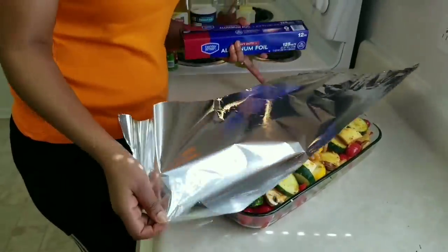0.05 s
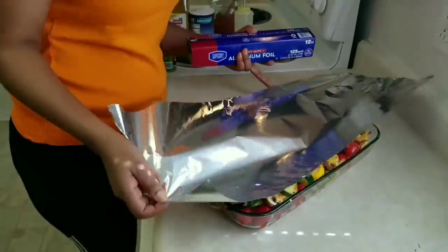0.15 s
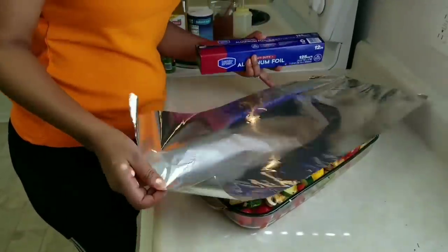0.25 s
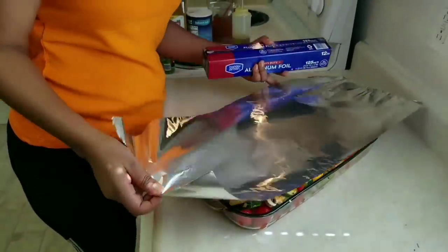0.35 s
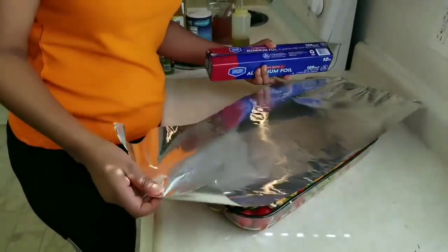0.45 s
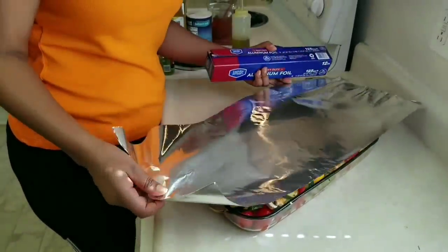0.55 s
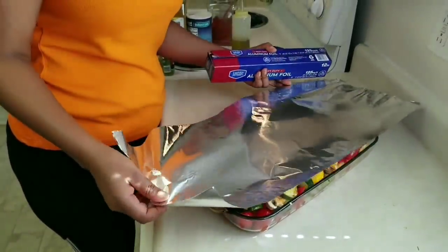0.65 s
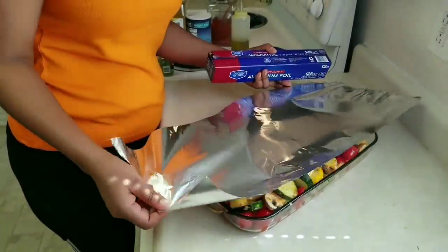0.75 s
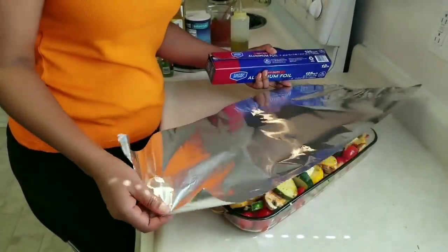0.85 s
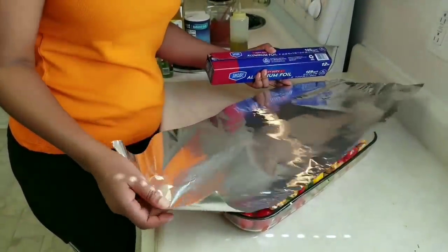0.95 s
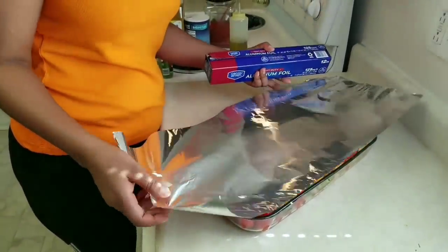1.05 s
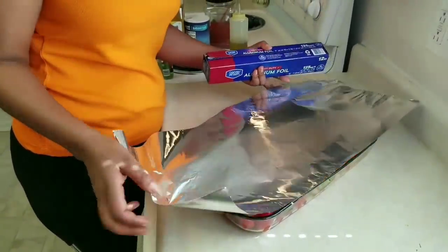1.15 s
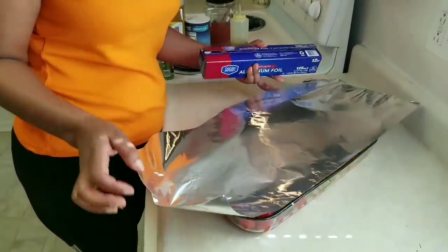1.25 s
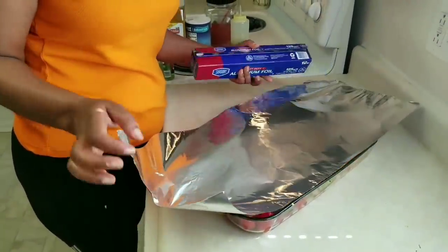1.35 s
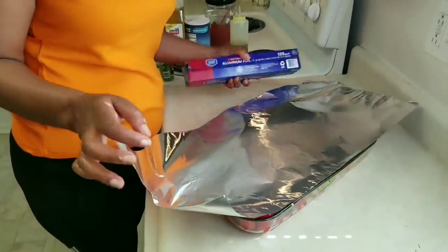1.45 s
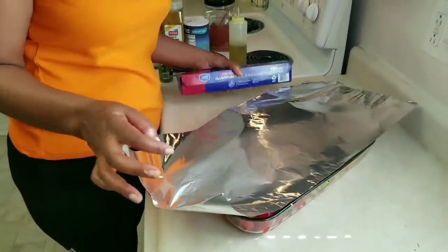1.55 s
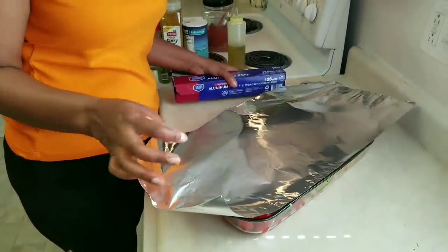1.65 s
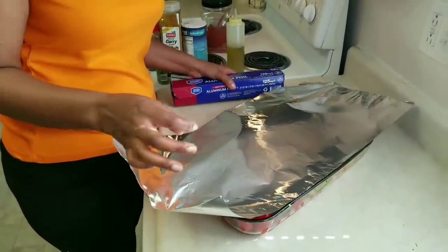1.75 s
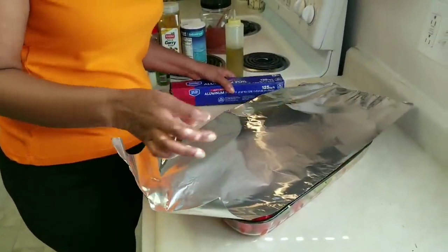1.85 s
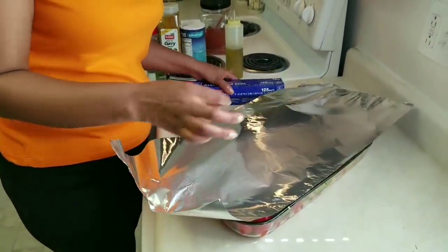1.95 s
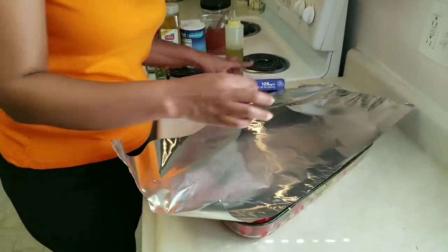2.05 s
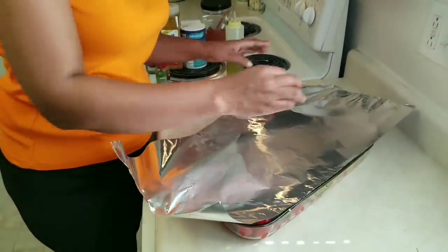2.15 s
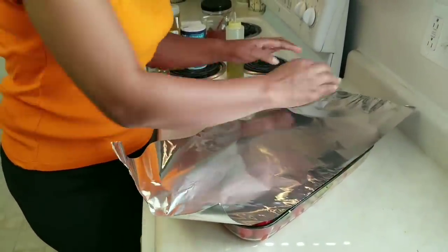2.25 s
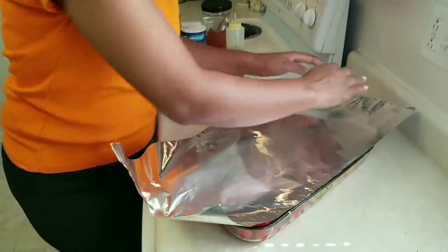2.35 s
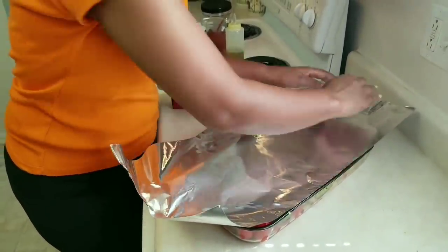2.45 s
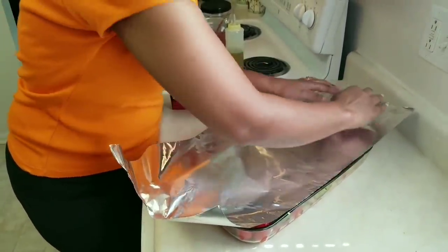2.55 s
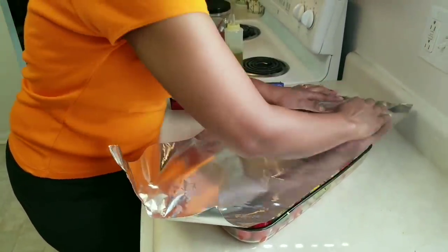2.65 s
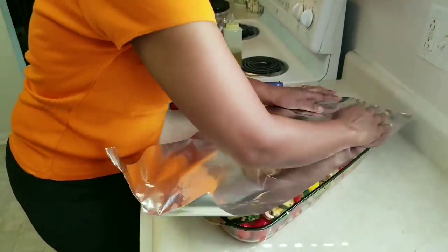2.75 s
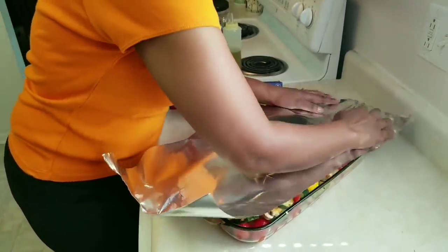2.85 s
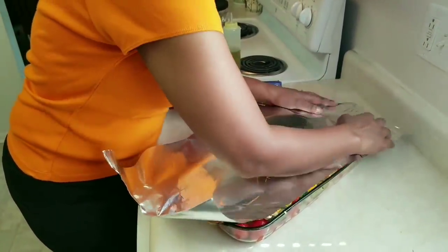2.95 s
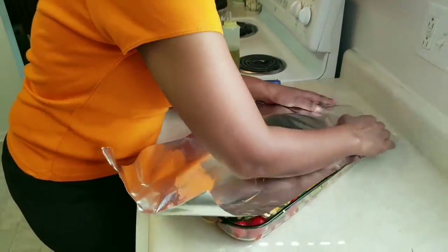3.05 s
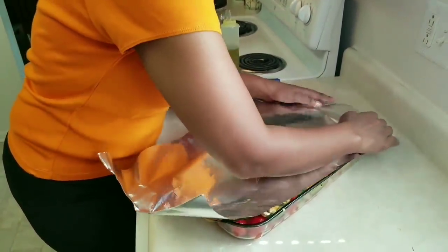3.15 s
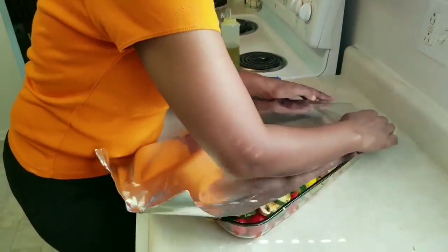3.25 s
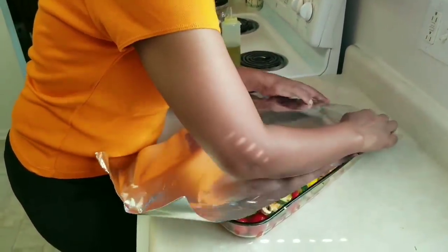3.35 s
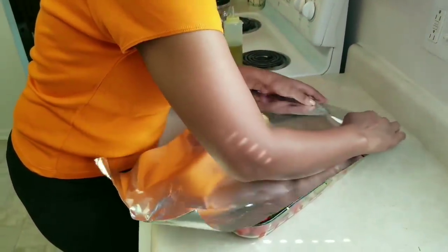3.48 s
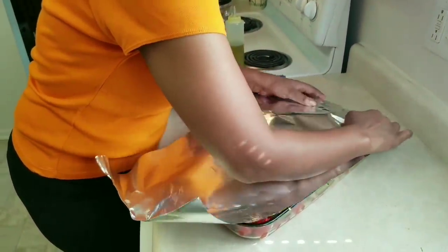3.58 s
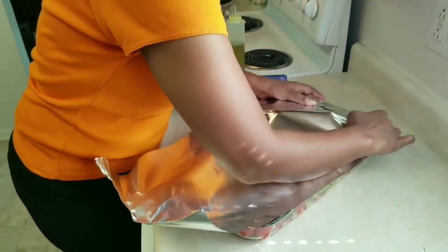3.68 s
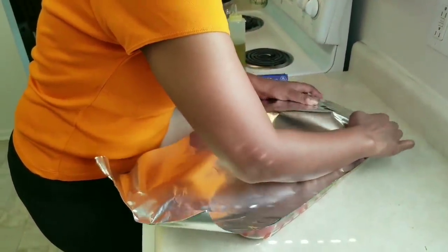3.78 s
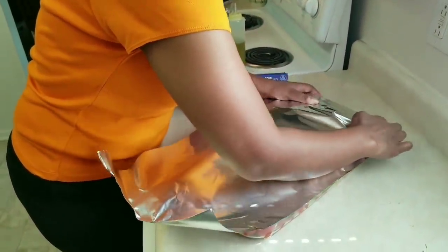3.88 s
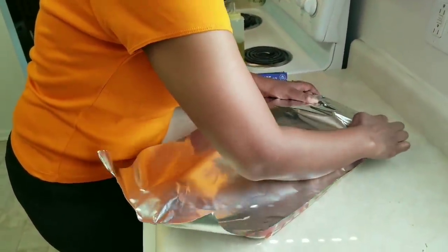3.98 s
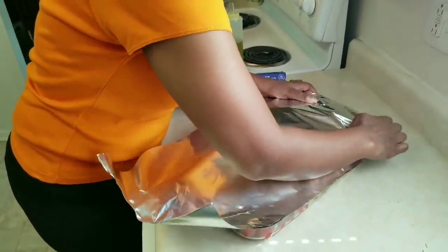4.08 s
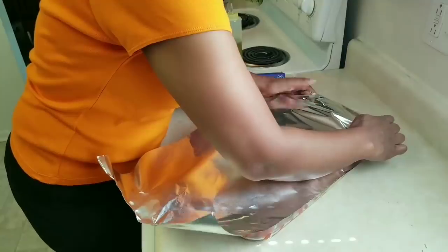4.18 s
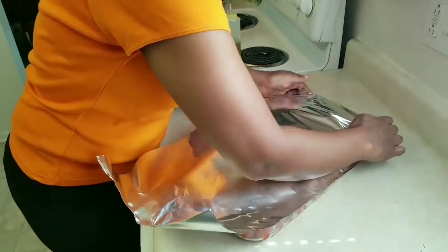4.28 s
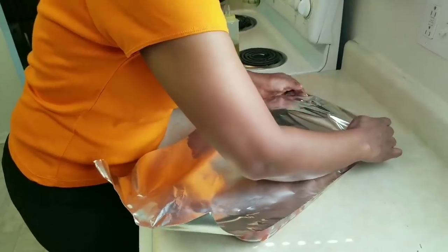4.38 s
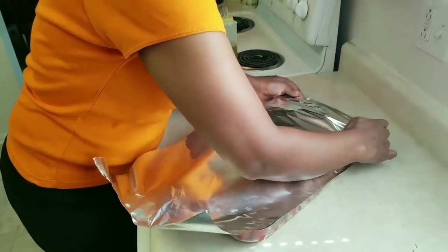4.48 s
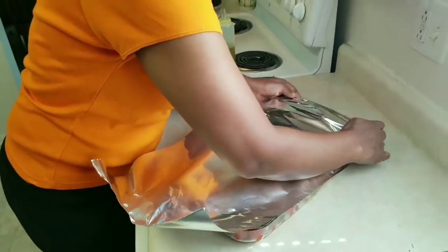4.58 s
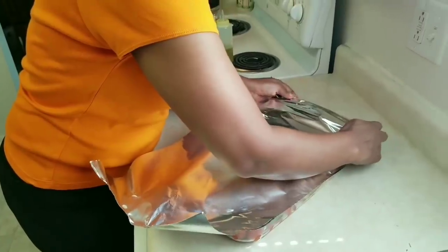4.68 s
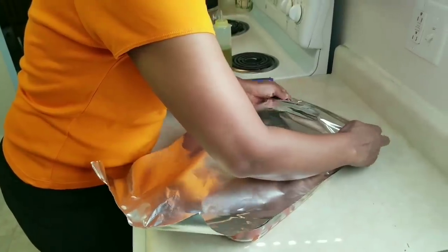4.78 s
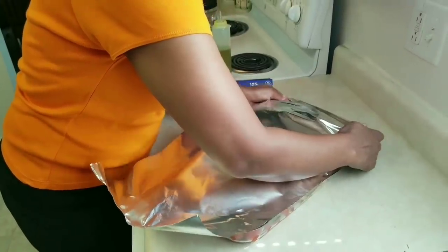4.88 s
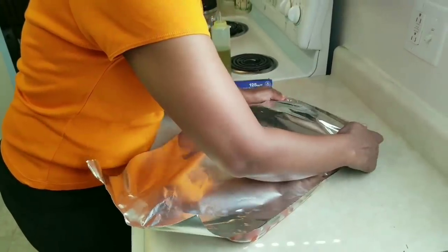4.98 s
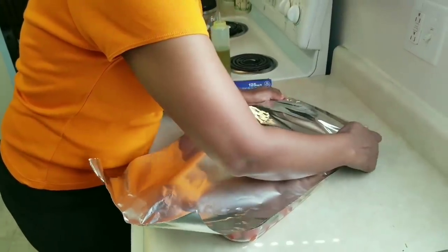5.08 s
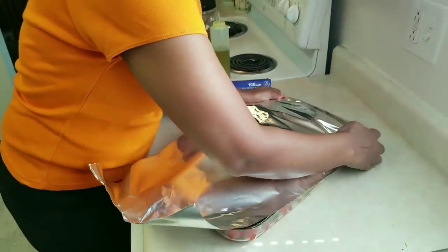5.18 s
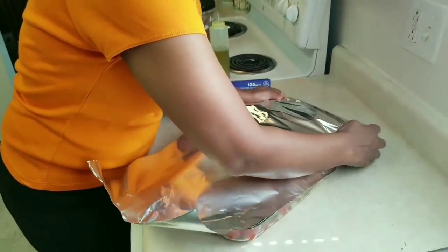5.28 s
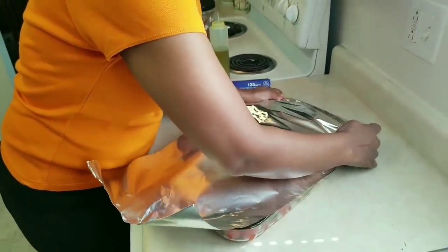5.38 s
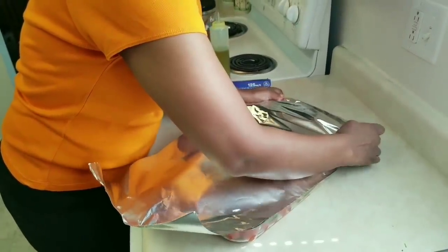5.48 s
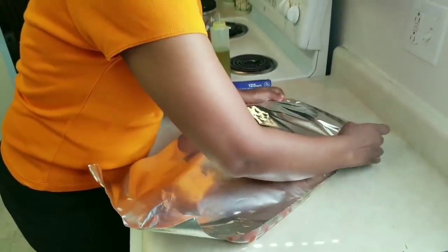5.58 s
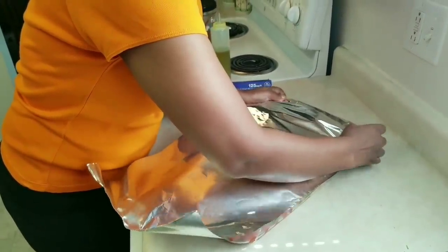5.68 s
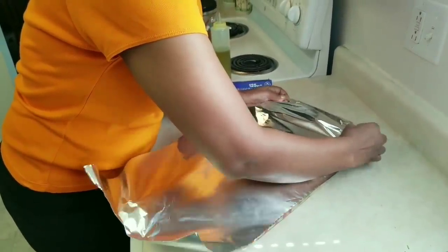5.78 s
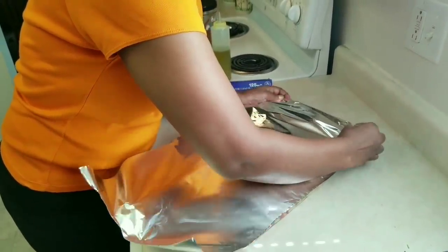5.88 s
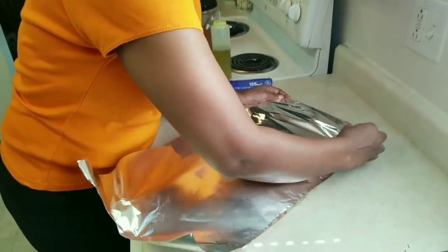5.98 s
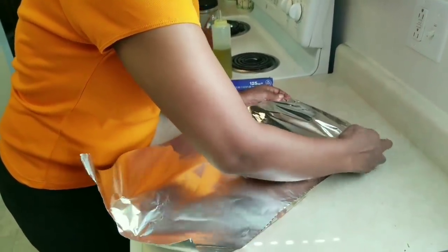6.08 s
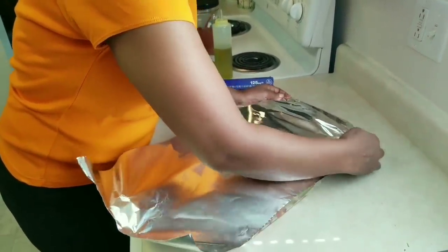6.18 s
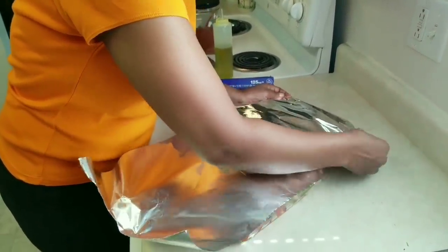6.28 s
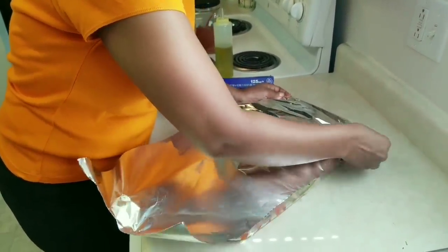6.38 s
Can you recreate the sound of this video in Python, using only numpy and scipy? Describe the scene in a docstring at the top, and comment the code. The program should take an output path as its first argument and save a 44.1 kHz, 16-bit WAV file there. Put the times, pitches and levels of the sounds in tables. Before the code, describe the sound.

Aluminium foil crinkles over a dish, a cardboard box knocks on the counter, then the foil crackles steadily as it is crimped.

```python
"""Aluminium foil is laid over a glass dish, then pressed and crimped round its rim in a hard-walled kitchen.
Creases buckle in swarms of tiny snaps, taut patches pop, and the covered dish booms under them.
In a pause a cardboard box is tapped, slid and set down on the counter. The house rumbles faintly.
Two microphone ports a hand apart pick it up; the right one is shaded: dull, with a notch in the treble."""
import sys
import numpy as np
from scipy import signal
from scipy.fft import rfft, irfft, next_fast_len
from scipy.io import wavfile
from scipy.ndimage import uniform_filter1d

SR = 44100
rng = np.random.default_rng(int(sys.argv[2]) if len(sys.argv) > 2 else 0)


def materialize(psi):
    """Save the field psi as 16-bit PCM at rate SR to the path in sys.argv[1].

    A 1-D psi becomes a single channel; in a 2-D psi each row is a channel.
    """
    bounded = np.clip(np.atleast_2d(psi).T, -1, 1)
    quanta = np.round(bounded * 32767).astype(np.int16)
    wavfile.write(sys.argv[1], SR, quanta)


N = 283563
PAD = next_fast_len(N + SR)
HZ = np.maximum(np.arange(PAD // 2 + 1) * SR / PAD, 5)

# hand pressure as the level of the finest ticks; the first list lays the foil, the other three run on one after
# another through a single crimping: (time [s], level [dB])
PRESSURE = [
    [(0.0, -53.5), (0.04, -63.5), (0.23, -61.5), (0.306, -40), (0.428, -35.5), (0.612, -52), (0.67, -66.5),
     (0.798, -40.5), (0.836, -49.5), (0.976, -42.5), (1.126, -61.5), (1.26, -39.5), (1.45, -78.5)],
    [(2.68, -102), (2.738, -38), (2.978, -49.5), (3.042, -57.5), (3.116, -44), (3.214, -60), (3.258, -48.5),
     (3.326, -48.5), (3.356, -38.5), (3.404, -54), (3.43, -39.5), (4.282, -49.5), (4.44, -76)],
    [(4.44, -69), (4.454, -45.5), (4.532, -39), (4.566, -43), (4.708, -61), (4.718, -55), (4.856, -54.5),
     (4.95, -45.5), (5.23, -49), (5.308, -43), (5.366, -55.5), (5.392, -64), (5.55, -66.5)],
    [(5.55, -63), (5.556, -55), (5.742, -55.5), (5.772, -44), (5.988, -45), (6.02, -43), (6.052, -58),
     (6.126, -47), (6.264, -62), (6.296, -48), (6.348, -56), (6.378, -40.5), (6.43, -49)],
]


def amp(db):
    """Decibels to gain."""
    return 10 ** (np.asarray(db) / 20)


def rms_one(x):
    """Scale to unit rms."""
    return x / np.sqrt(np.mean(x ** 2) + 1e-20)


def fader(points):
    """Gain curve through (time [s], level [dB]) points, silent outside them."""
    times, levels = np.transpose(points)
    return amp(np.interp(np.arange(N) / SR, times, levels, left=-140, right=-140))


def at_hz(points, hz=HZ):
    """Read a table on a log-frequency axis."""
    freqs, values = np.transpose(points)
    return np.interp(np.log(hz), np.log(freqs), values)


def minimum_phase(spectrum_db):
    """Causal filter response of the given magnitude."""
    cepstrum = irfft(spectrum_db * np.log(10) / 20, PAD)
    cepstrum[1:PAD // 2] *= 2
    cepstrum[PAD // 2 + 1:] = 0
    return np.exp(rfft(cepstrum))


def colour(x, spectrum_db):
    """Filter that keeps the power of a white input."""
    filtered = irfft(rfft(x, PAD) * minimum_phase(spectrum_db), PAD)[..., :N]
    return filtered / np.sqrt(np.mean(amp(2 * spectrum_db)))


def drift(rate_hz):
    """Slow random wander of unit rms."""
    r = np.exp(-2 * np.pi * rate_hz / SR)
    return rms_one(signal.lfilter([1], [1, -2 * r, r * r], rng.standard_normal(N + SR))[SR:])


def snaps(per_s, spread_db, clump_db):
    """Random clicks of uneven size that swell in clumps; unit rms."""
    sizes = amp(spread_db * np.minimum(rng.exponential(1, N), 4.0)) * rng.choice([-1, 1], N)
    fires = rng.random(N) < per_s / SR
    return rms_one(sizes * fires * amp(clump_db * drift(rate_hz=34.3)))


def ring(clicks, hz, t60):
    """Clicks set one mode ringing; a small body radiates little below its mode."""
    r, w = amp(-60 / (t60 * SR)), 2 * np.pi * hz / SR
    return signal.lfilter([.5, 0, -.5], [1, -2 * r * np.cos(w), r * r], clicks + 1e-18)


def diffuse_pair(mid, side):
    """Two unrelated signals become left and right spectra that largely agree in the bass."""
    # likeness of the two ports: (frequency [Hz], correlation [0..1])
    likeness = [(60, 0.81), (250, 0.48), (630, 0.68), (1400, 0), (3000, 0.098)]
    alike = at_hz(likeness)
    common = np.sqrt(1 + alike) * rfft(mid, PAD)
    opposed = np.sqrt(1 - alike) * rfft(side, PAD) * [[1], [-1]]
    return (common + opposed) / 2 ** .5


def room_tone():
    """The rumble of the house and the hiss of the preamp; unit rms."""
    # noise floor: (frequency [Hz], relative density [dB])
    rumble = [(13, -30), (22, -40), (43, 6.5), (69, 7.5), (129, 4.5), (189, -15), (270, -1), (563, -12),
              (663, -24), (971, -29), (2450, -59), (3900, -27), (9070, -30.5), (14800, -28)]
    noise = diffuse_pair(*rng.standard_normal((2, N)))
    return rms_one(irfft(noise * amp(at_hz(rumble)), PAD)[:, :N])


def kitchen(sources, reverb_db=-3.5):
    """Left and right spectra: each source arrives direct and in its own diffuse tail off the walls."""
    # reverberation: (frequency [Hz], t60 [s])
    room_t60 = [(125, 0.32), (500, 0.19), (1500, 0.56), (4000, 0.35), (8000, 0.067), (14000, 0.078)]
    age, tails, at_ports = np.arange(SR * 3 // 4) / SR, 0, 0
    white = rng.standard_normal((2, len(sources), 2, len(age)))
    edges_hz = 40 * 2 ** np.arange(0, 9.1, .75)
    for k, (low, high) in enumerate(zip(edges_hz, edges_hz[1:])):
        t60 = at_hz(room_t60, np.sqrt(low * high))
        band = signal.sosfilt(signal.butter(2, [low, high], "band", fs=SR, output="sos"), white[k % 2])
        decay = amp(-60 * age / t60) / np.sqrt(t60 * SR / np.log(1e6))   # unit energy
        tails = tails + band * decay
    tails = tails * np.minimum(age / 0.0011, 1)   # the reflections fade in
    lags_s = rng.uniform(-.0003, .0003, len(sources))   # the ports lie a hand apart
    for source, tail, lag in zip(sources, tails, lags_s):
        direct = np.exp(np.array([[0], [-2j * np.pi * lag]]) * HZ)
        at_ports = at_ports + rfft(source, PAD) * (direct + amp(reverb_db) * diffuse_pair(*tail))
    return at_ports


def shaded_microphone(left, right):
    """Port spectra become a stereo signal; the cook's arms and body shade the right side."""
    # right port against the left: (frequency [Hz], gain [dB])
    right_port = [(100, 3.5), (400, -1.5), (1250, -1.5), (2300, -3.5), (4250, -10), (6500, -19),
                  (7600, -30.5), (8200, -43), (9200, -50), (10000, -17), (11500, -11.5), (14500, -12.5)]
    # changing shade on the right port above the bass: (time [s], gain [dB])
    shade = [(0, -4.5), (1.2, -1), (2, 0), (2.7, -2), (4, 0.5), (4.5, -4.5), (6.43, -2.5)]
    right = right * minimum_phase(at_hz(right_port))
    bass = 1 / (1 + 1j * HZ / 600)   # long waves bend round the body
    left, right_bass, right_top = irfft(np.array([left, right * bass, right * (1 - bass)]), PAD)[:, :N]
    return np.array([left, right_bass + fader(shade) * right_top])


def dish_shifting(flexing):
    """The dish shifts under the crimping: low noise that follows the smoothed flexing of the foil."""
    # dull thud of the dish: (frequency [Hz], relative density [dB])
    thud = [(25, -18), (55, -3.5), (120, -2.5), (250, -3), (400, -24)]
    crimping = np.arange(N) / SR > PRESSURE[1][0][0]
    push = amp(-19.5) * uniform_filter1d(flexing * crimping, int(0.054 * SR))
    return colour(push * rng.standard_normal(N), at_hz(thud))


def counter_scuffs():
    """Box and sleeves slide on the counter: a grainy scuff over a dull rub, swelling and fading."""
    # strokes: (peak time [s], scuff level [dB], rub level [dB], swell t60 [s], fade t60 [s])
    strokes = [(1.46, -56.5, -63, 0.9, 0.44), (1.617, -42, -43.5, 0.019, 0.23),
               (1.76, -66.5, -59.5, 0.99, 3.6), (1.904, -62, -65, 0.024, 1),
               (2.009, -46.5, -46, 0.26, 0.53), (2.49, -93, -73, 0.091, 0.1),
               (2.547, -61, -84, 0.017, 0.22)]
    # midrange friction: (frequency [Hz], relative density [dB])
    scuff_spectrum = [(900, -7.5), (1300, -0.5), (1600, -2.5), (2100, 0.5), (2700, -1), (3300, -10.5),
                      (7500, -16), (9000, -36), (15000, -26)]
    # low friction: (frequency [Hz], relative density [dB])
    rub_spectrum = [(80, -10), (200, 5.5), (450, 13), (900, 4), (1500, -22.5)]
    t, scuff, rub = np.arange(N) / SR, 0, 0
    for s, scuff_db, rub_db, swell, fade in strokes:
        loss_db = np.minimum(60 * np.maximum((s - t) / swell, (t - s) / fade), 140)
        scuff = scuff + amp(scuff_db - loss_db)
        rub = rub + amp(rub_db - loss_db)
    return (colour(scuff * snaps(8000, spread_db=2.0, clump_db=3.0), at_hz(scuff_spectrum))
            + colour(rub * rng.standard_normal(N), at_hz(rub_spectrum)))


def box_knocks(damped_t60_s=.055, crack_t60_s=0.017):
    """Each contact of the hand-held box rings damped box and counter modes and adds a short crack."""
    # contacts, at relative levels: (time [s], box [dB], counter [dB], crack [dB])
    knocks = [(1.616, -20.5, -68, -32.5), (1.664, -34, -68, -48), (1.904, -45, -42.5, -69),
              (1.989, -30, -34.5, -65), (1.999, -20, -17.5, -60), (2.011, -26.5, -55, -68),
              (2.031, -62, -26.5, -61), (2.047, -54, -49, -60), (2.1, -54, -76.5, -61),
              (2.478, -80, -52.5, -99)]
    # cardboard modes: (frequency [Hz], relative level [dB], t60 before damping [s])
    box_modes = [(580, -31, 0.076), (763, 1, 0.08), (848, 4.5, 0.074), (879, 10.5, 0.034),
                 (970, 0.5, 0.043), (1170, -5, 0.032), (1363, 6.5, 0.022), (1760, -6, .04),
                 (2250, -10, 0.025)]
    # counter modes: (frequency [Hz], relative level [dB], t60 before damping [s])
    counter_modes = [(59.5, -8, 0.16), (122, -13, 0.1), (159, -1, 0.055), (190, -17, 0.11),
                     (286, -7, 0.091), (375, 2, 0.2), (423, -7.5, 0.14)]
    times, box_db, counter_db, crack_db = np.transpose(knocks)
    at, ringing = np.round(times * SR).astype(int), np.zeros(N)
    for modes, strike_db, soft_hz in ((box_modes, box_db - 18, 2500), (counter_modes, counter_db - 8, 700)):
        contact = signal.butter(2, soft_hz, fs=SR)   # cardboard gives: the contact is not sharp
        for hz, level_db, t60 in modes:
            clicks = np.zeros(N)
            clicks[at] = amp(strike_db + level_db + rng.normal(0, 2.3, len(at)))
            ringing += ring(signal.lfilter(*contact, clicks + 1e-18), hz, min(t60, damped_t60_s))
    hits = np.zeros(N)
    hits[at] = amp(crack_db - 4.5)
    decay = signal.lfilter([1], [1, -amp(-60 / (crack_t60_s * SR))], hits + 1e-18)
    crack_spectrum = at_hz([(1000, -18), (2500, 5), (7000, 6), (9000, -21), (13000, -28)])
    return ringing + colour(decay * rng.standard_normal(N), crack_spectrum)


def hands(mean_pressure_db=-48):
    """One pressure drives ticks, crackle and flexing; the coarser the layer, the less it swings."""
    # broad flexing at mean pressure, growing once the sheet closes over the dish: (time [s], level [dB])
    flexing_level = [(0, -48.5), (1.45, -52), (2.68, -49.5), (3.2, -48.5), (3.5, -45), (4.2, -42),
                     (4.6, -44), (5.0, -46.5), (5.4, -46), (5.8, -47.5), (6.43, -42)]
    ticks = sum(fader(points) for points in PRESSURE)
    swing = ticks / amp(mean_pressure_db)
    crackle = amp(-40.5) * swing ** 0.64
    flexing = fader(flexing_level) * swing ** 0.42
    touching = ticks > amp(-120)
    return np.array([ticks, crackle, flexing]) * touching


def foil_pops(spots, rise_s=0.0014, t60_s=0.041):
    """Taut patches of foil flip over and ring briefly; one track for each spot on the sheet."""
    # flips: (time [s], level [dB], starting pitch [Hz])
    pops = [(2.963, -33, 2090), (3.253, -20.5, 1970), (3.412, -27, 763), (3.492, -24, 760),
            (3.613, -33, 1070), (3.815, -20.5, 1014), (3.902, -27, 1315), (3.943, -35, 1920),
            (4.172, -22.5, 824), (4.523, -25, 781), (4.776, -33, 2250), (5.347, -29, 800),
            (5.558, -35, 1900), (5.638, -29, 1720), (5.939, -28.5, 783), (6.016, -30, 1370),
            (6.31, -27, 2240), (6.368, -30, 2220)]
    sheet, age = np.zeros((spots, N)), np.arange(SR // 3) / SR
    flip = amp(-60 * age / t60_s) * (1 - np.exp(-age / rise_s))
    for k, (s, level_db, hz) in enumerate(pops):
        i = round(s * SR)
        tone = np.sin(2 * np.pi * hz * age * (1 - 0.84 * age))   # sags as the patch slackens
        sheet[k % spots, i:i + len(age)] += (amp(level_db) * flip * tone)[:N - i]
    return sheet


def foil_crinkle(force, spots, rise_s=0.0034):
    """Snaps follow the hands; each buckle adds a sharp crease and a dying swarm. One track a spot."""
    # sudden buckles: (time [s], relative level [dB], flexing against crackle [dB], t60 [s])
    buckles = [(0.0386, -30.5, -7, 0.11), (0.1421, -35, -6, 0.15), (0.29, -34, -1, 0.09),
               (0.404, -22, -31, 0.06), (0.5794, -36, -11, 0.12), (0.7116, -32, -5, 0.062),
               (0.7597, -24, -24, 0.11), (0.793, -21.5, -28, 0.09), (0.8784, -18.5, -13.5, 0.19),
               (0.964, -18, -23, 0.078), (1.019, -27, -13, 0.12), (1.2022, -21.5, -10.5, 0.062),
               (1.2474, -28.5, -2, 0.062), (2.7167, -26, -3, 0.06), (2.7422, -29, -1, 0.14),
               (2.8955, -20.5, -12, 0.084), (2.954, -20.5, -0.5, 0.065), (3.0574, -29.5, -3, 0.1),
               (3.1105, -22, -2, 0.064), (3.149, -33, 6, 0.1), (3.2297, -29, -8, 0.09),
               (3.254, -21.5, -25, 0.09), (3.3465, -22.5, -25, 0.081), (3.4242, -20.5, -4, 0.069),
               (3.4383, -20, 9, 0.048), (3.4894, -17, -2, 0.12), (3.569, -17.5, -14, 0.051),
               (3.6446, -48, -14, 0.046), (3.6978, -17.5, -1.5, 0.088), (3.7984, -24.5, 0, 0.12),
               (3.819, -22, 3.5, 0.1), (3.9419, -21.5, -3.5, 0.2), (4.0492, -17.5, 1, 0.032),
               (4.123, -43, -12, 0.11), (4.197, -18, -11, 0.031), (4.3394, -31, -7, 0.056),
               (4.3836, -30, -14, 0.14), (4.452, -26.5, -17, 0.081), (4.5217, -15.5, 4.5, 0.056),
               (4.7173, -22.5, -37, 0.073), (4.775, -24.5, -16, 0.042), (4.876, -34.5, -9, 0.2),
               (4.911, -24, -5, 0.16), (4.959, -25, 1, 0.099), (5.018, -22, 0, 0.043),
               (5.093, -32, -13, 0.17), (5.296, -21.5, -1, 0.075), (5.347, -23.5, 3.5, 0.071),
               (5.4267, -31.5, 4, 0.11), (5.4884, -32, -4, 0.059), (5.557, -30, -21, 0.056),
               (5.6, -26.5, -3, 0.14), (5.6425, -22.5, -3.5, 0.083), (5.7269, -24.5, -6, 0.07),
               (5.7734, -25, -28.5, 0.13), (5.8987, -24, -7, 0.051), (5.94, -32, 10, 0.13),
               (6.0176, -25, -1, 0.042), (6.083, -27.5, -14, 0.09), (6.1256, -22.5, -2, 0.058),
               (6.2875, -28.5, -1.5, 0.19), (6.3673, -32, -17, 0.13)]
    # finest ticks: (frequency [Hz], relative density [dB])
    tick_spectrum = [(4000, -20), (7000, 7.5), (8800, -1.5), (13500, 5), (15000, -4)]
    # crackle of the creases: (frequency [Hz], relative density [dB])
    crackle_spectrum = [(500, -43.5), (1000, -8.5), (1600, -5), (2200, -0.5), (3000, -1), (4300, -4),
                        (6800, -6.5), (8500, -19.5), (12000, -39)]
    # broad flexing of the sheet: (frequency [Hz], relative density [dB])
    flex_spectrum = [(150, -36.5), (300, -14.5), (460, -12), (630, -8.5), (760, 1), (920, -4.5),
                     (1500, -4.5), (2300, -11.5), (3500, -42)]
    # resonances of the air under the foil: (frequency [Hz], width [Hz], lift [dB])
    dish_air = [(746, 1100, -2.5), (1070, 170, -0.5), (1940, 220, 3)]
    force, creases, age = force.copy(), np.zeros((spots, N)), np.arange(SR // 3) / SR
    rise = 1 - np.exp(-age / rise_s)
    for k, (s, level_db, flex_db, t60) in enumerate(buckles):
        i = round(s * SR)
        strengths = amp(level_db + np.array([[-13.5], [-11.5], [flex_db - 11.5]]))   # ticks, crackle, flex
        swarm = rise * amp(-60 * age / t60)
        force[:, i:i + len(age)] += strengths * swarm[:N - i]
        creases[k % spots, i] = amp(level_db + 4) * (-1) ** k
    lift_db = sum(db / (1 + (2 * (HZ - hz) / width) ** 2) for hz, width, db in dish_air)
    on_spot = rng.integers(0, spots, N) == np.arange(spots)[:, None]   # every snap falls on one spot
    tick_force, crackle_force, flex_force = force[:, None] * on_spot
    ticks = tick_force * snaps(5000, spread_db=0.5, clump_db=1.5) + creases * amp(-7)
    crackle = crackle_force * snaps(9000, spread_db=1.0, clump_db=2.0) + creases
    flexing = flex_force * snaps(2500, spread_db=4.0, clump_db=3.0)
    return (colour(ticks, at_hz(tick_spectrum))
            + colour(crackle, at_hz(crackle_spectrum) + lift_db)
            + colour(flexing, at_hz(flex_spectrum) + lift_db))


def scene():
    """Foil, box and dish in the kitchen, heard at the two microphone ports over the room tone."""
    spots = 9   # places on the sheet that sound, each with its own path to the microphone
    force = hands()
    foil = foil_crinkle(force, spots) + foil_pops(spots)
    counter = box_knocks() + counter_scuffs() + dish_shifting(flexing=force[2])
    left, right = kitchen([*foil, counter])
    return amp(4.5) * shaded_microphone(left, right) + amp(-61) * room_tone()


def record(dry, cutoff_hz=14620):
    """A steep low-pass cuts the top of the treble."""
    return signal.sosfilt(signal.ellip(14, .5, 70, cutoff_hz, fs=SR, output="sos"), dry)


dry = scene()
out = record(dry)
materialize(out)
```